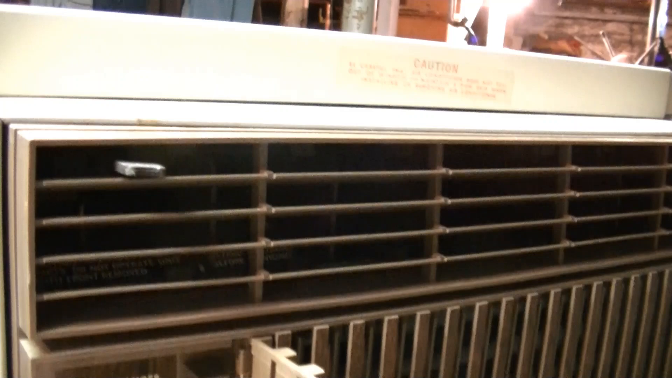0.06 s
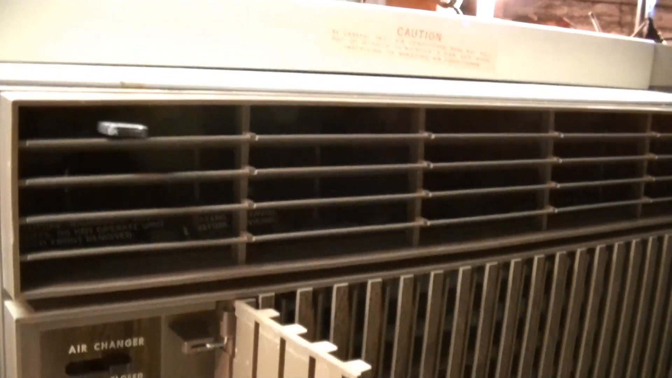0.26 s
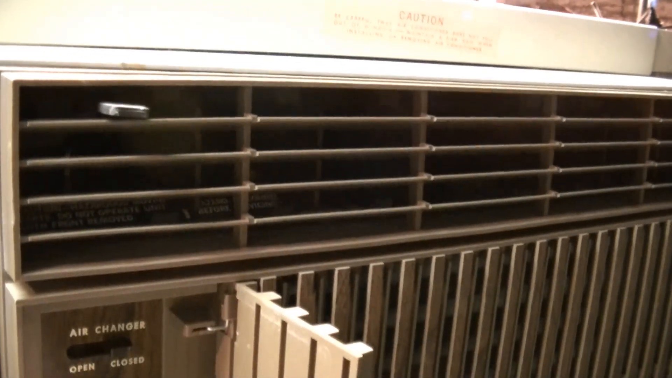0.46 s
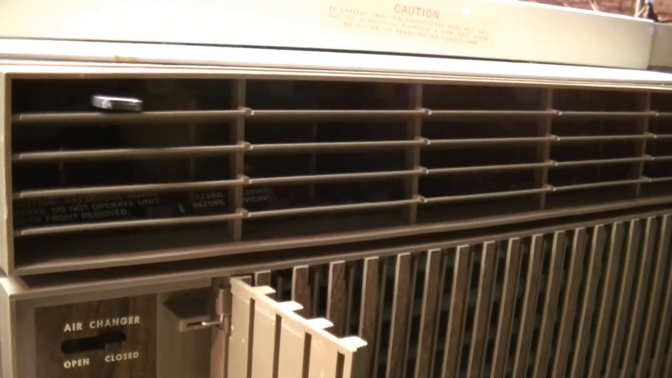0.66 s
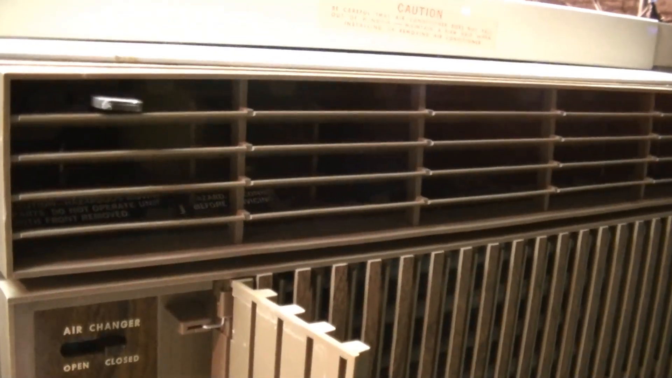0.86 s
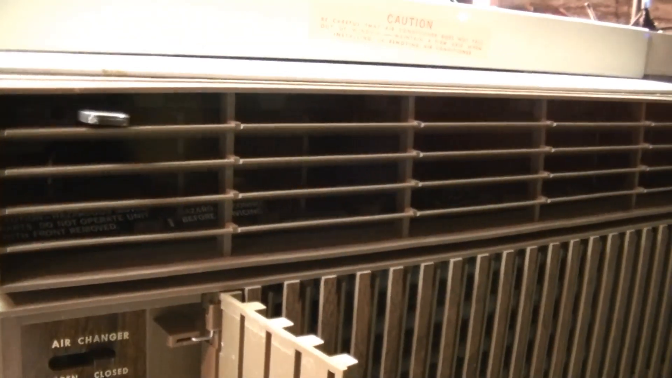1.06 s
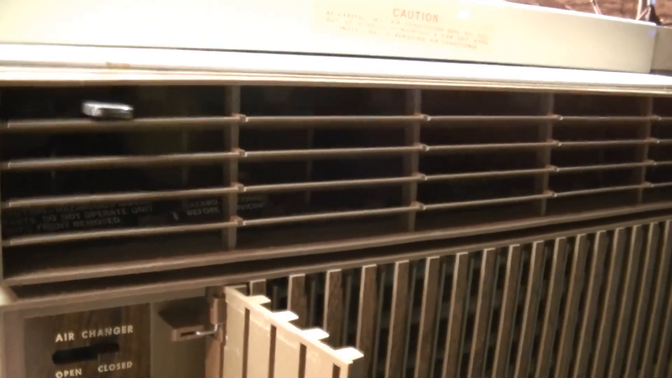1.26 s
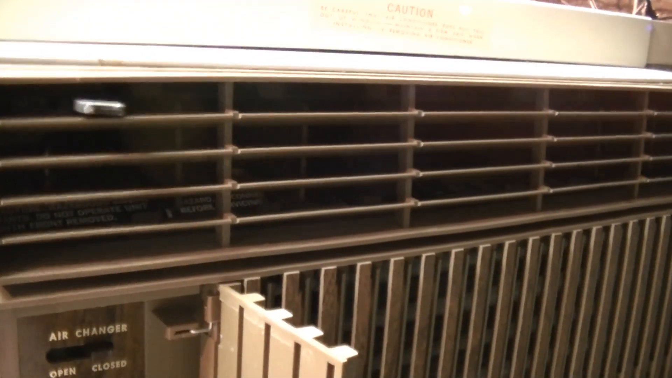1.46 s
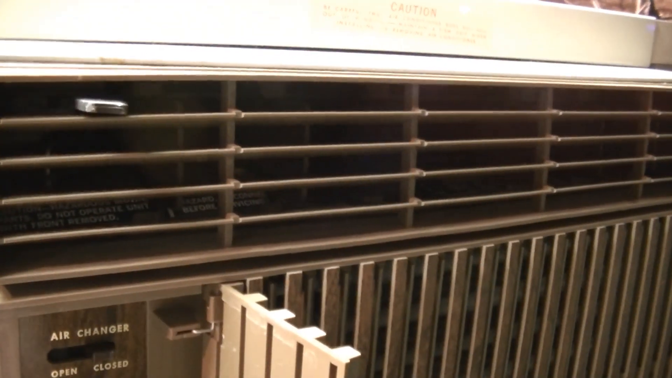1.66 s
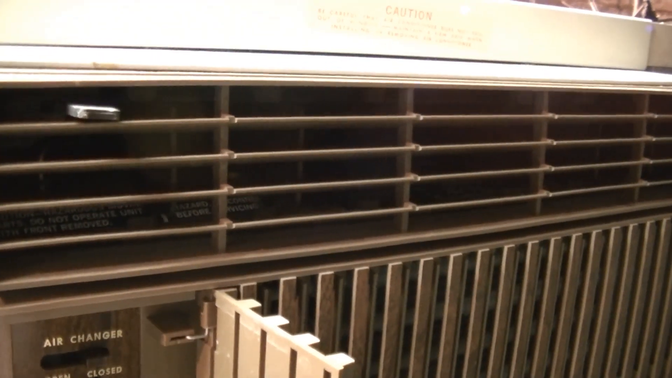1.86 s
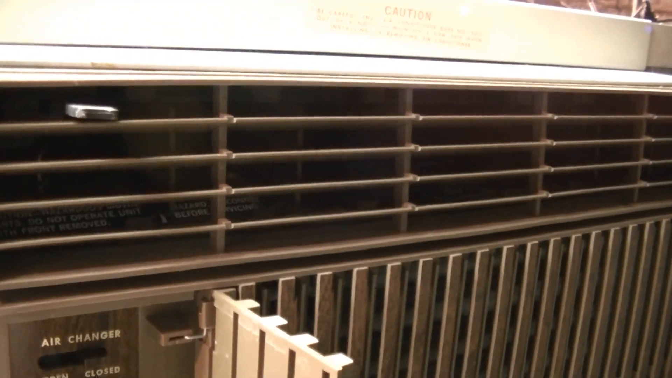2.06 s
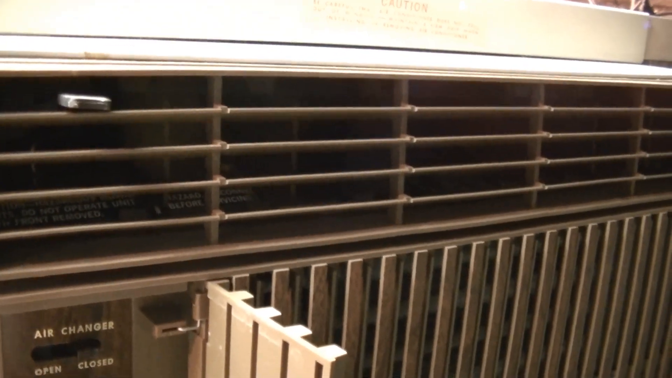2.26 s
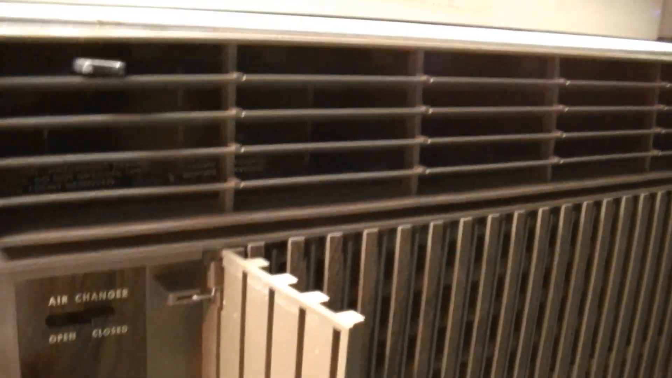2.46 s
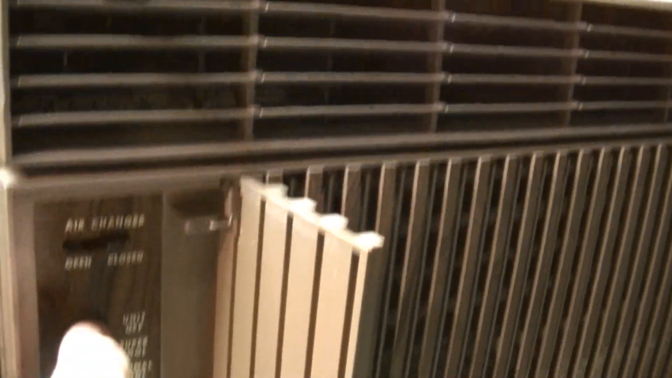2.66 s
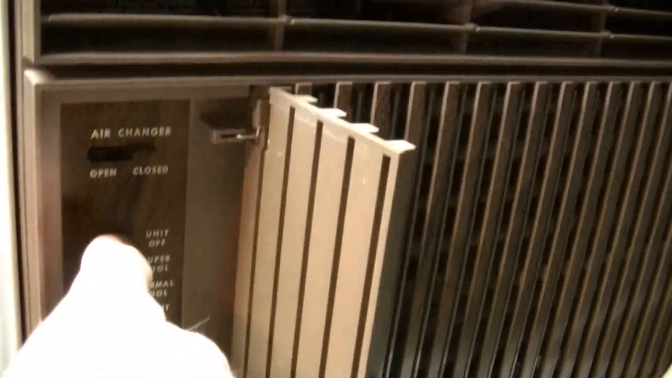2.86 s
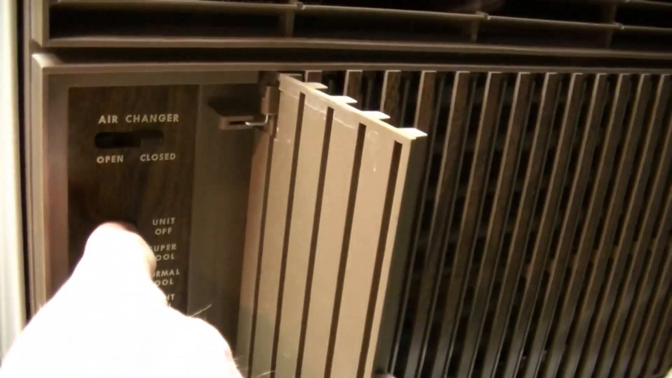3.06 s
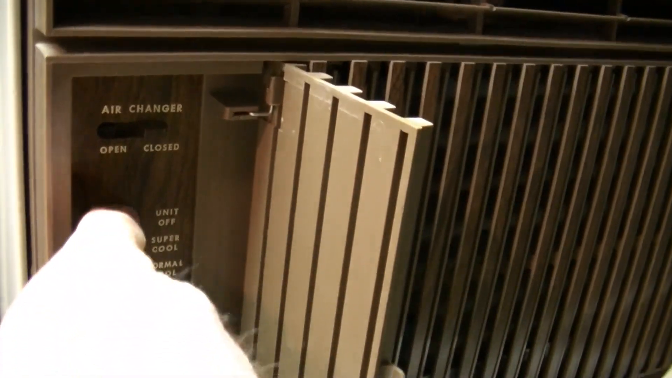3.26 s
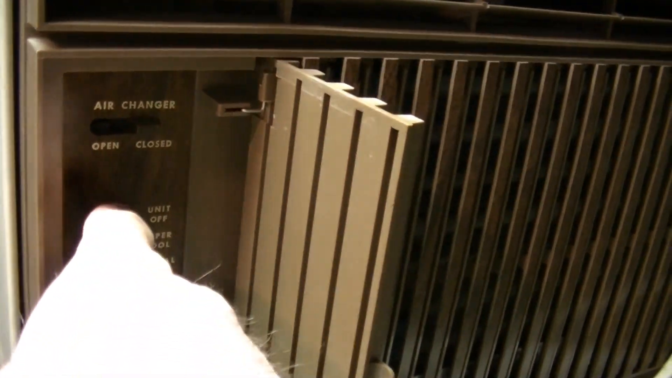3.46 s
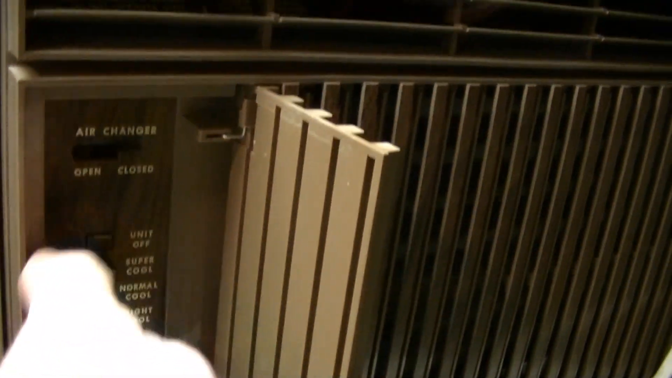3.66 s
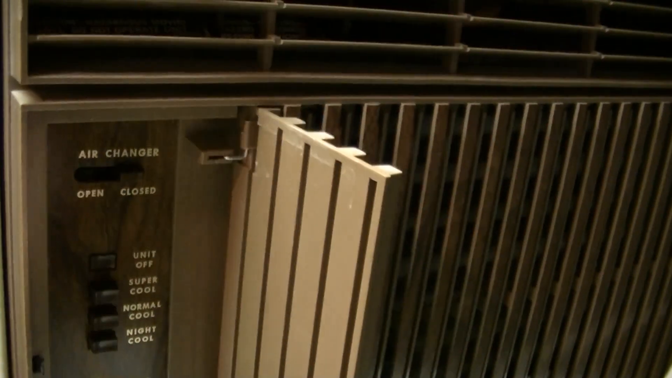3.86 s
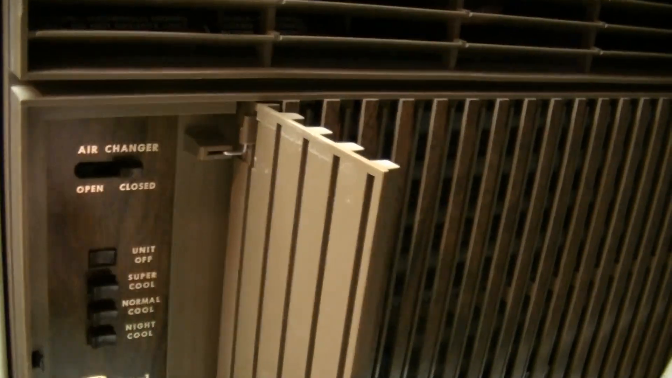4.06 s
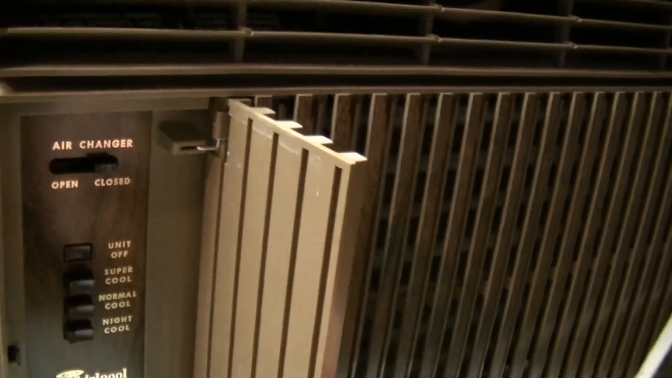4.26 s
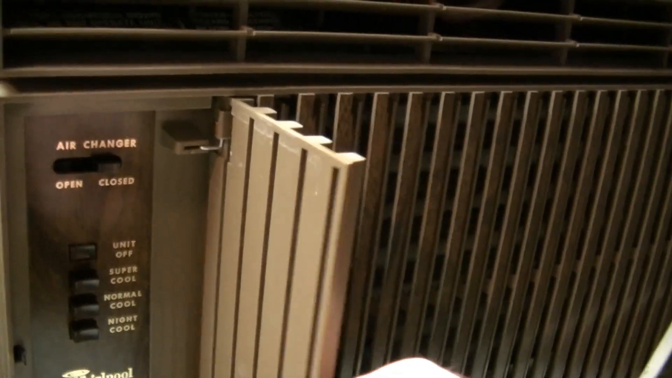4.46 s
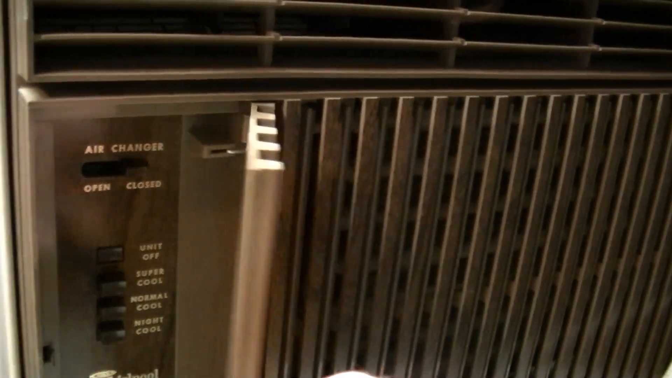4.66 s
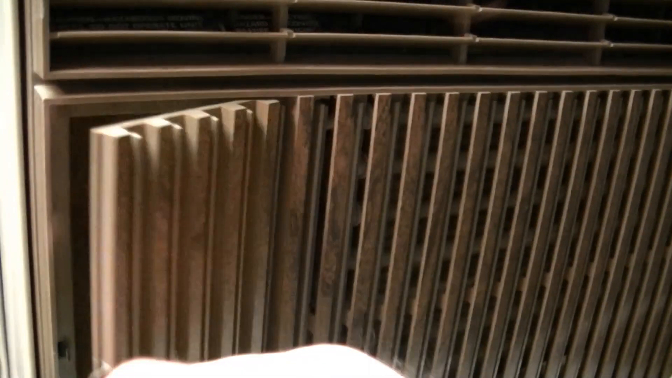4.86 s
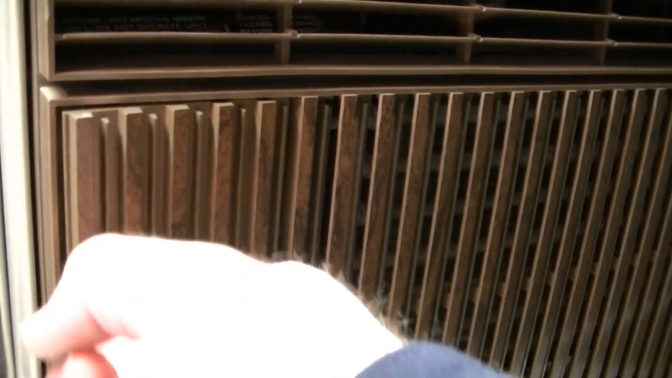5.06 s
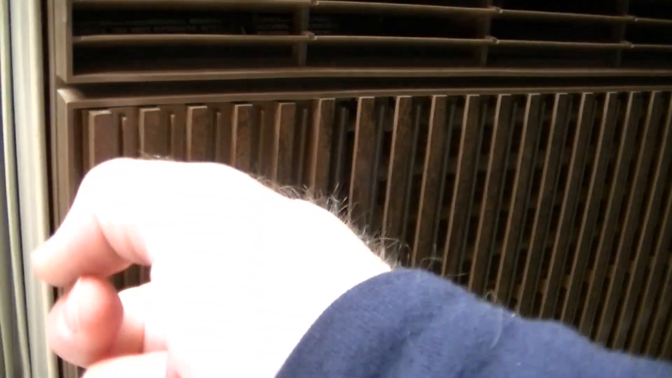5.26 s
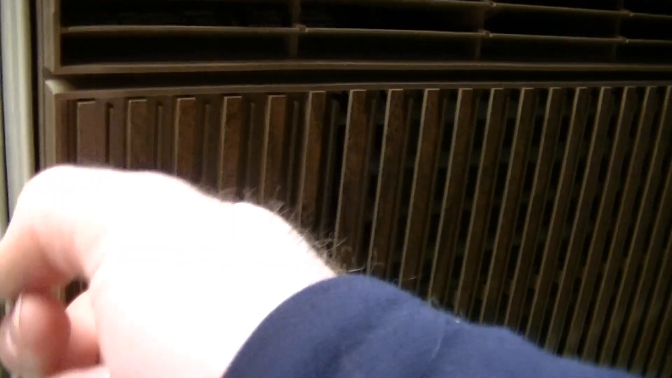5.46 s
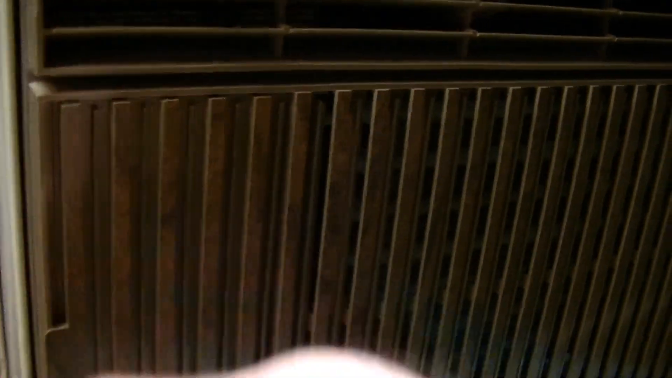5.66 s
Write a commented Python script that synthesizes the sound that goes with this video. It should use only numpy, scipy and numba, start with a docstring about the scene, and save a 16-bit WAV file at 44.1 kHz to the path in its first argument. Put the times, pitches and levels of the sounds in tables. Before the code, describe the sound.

Loud compressor hum and fan rush with thumping draught, a switch clack, a fading hollow whir, then plastic scrapes and a sharp latch snap.

```python
"""An old window air conditioner, close up: compressor lines hum and buzz under the blower's filtered noise,
and eddies of cold draught buffet the microphone until it moves down to the controls. The off button clicks,
the blower coasts down and the compressor stalls; narrow noise bands whistle faintly as refrigerant evens out.
A high squeak sinks in pitch, the plastic door slips over its catch, and a brief noise swell leads into the
latch snapping home; short noise bursts and decaying modes make these contacts."""
import sys
import numpy as np
from scipy import signal
from scipy.fft import rfft, irfft, next_fast_len
from scipy.io import wavfile
from scipy.ndimage import uniform_filter1d
from numba import njit

SR = 44100
rng = np.random.default_rng(int(sys.argv[2]) if len(sys.argv) > 2 else 0)


def persist_wave(psi):
    """Save psi, clipped to +-1, as 16-bit WAV."""
    counts = np.round(np.clip(psi, -1, 1) * 32767).astype(np.int16)
    wavfile.write(sys.argv[1], SR, np.atleast_2d(counts).T)


N = 252252
T = np.arange(N) / SR


def undb(db):
    """Decibels to amplitude gain."""
    return 10 ** (np.asarray(db) / 20)


def unit(x):
    """Scale to rms 1."""
    return x / np.sqrt(np.mean(x ** 2))


def curve(rows):
    """One control per column, joined by straight lines in time."""
    s, *columns = np.transpose(rows)
    return [np.interp(T, s, c) for c in columns]


def across(points, hz):
    """Read (Hz, value) points on a log-frequency axis."""
    f, value = np.transpose(points)
    return np.interp(np.log(hz + 1), np.log(f), value)


def colour(x, points, peaks=(), tilt=0):
    """Filter by a spectrum plus resonances; tilt is in dB per octave above 900 Hz."""
    size = next_fast_len(x.shape[-1])
    hz = np.arange(size // 2 + 1) * SR / size
    db = across(points, hz) + tilt * np.log2(np.maximum(hz, 900) / 2000)
    for f, width, lift in peaks:
        db = db + lift / (1 + (2 * (hz - f) / width) ** 2)
    return irfft(rfft(x, size) * undb(db), size)[..., :x.shape[-1]]


# colour of the difference between the two microphone ports: freq_hz, lift_db
PORT_DIFFERENCE = [(25, 4), (60, 7), (250, -3.5), (2500, -3.5), (5500, 6.5), (11000, 9.5)]


def noise(side_db, size=N):
    """Two-port noise: shared part plus an opposed part, coloured, then scaled by side_db."""
    mid, side = rng.standard_normal((2, size))
    side = colour(side, PORT_DIFFERENCE)
    return mid + undb(side_db) * np.array([side, -side])


def walk(rate_hz):
    """Smooth random wander, spread near 1."""
    k = int(SR / rate_hz)
    steps = np.repeat(rng.standard_normal(N // k + 1), k)
    return 1.25 * uniform_filter1d(uniform_filter1d(steps, k), k)[:N]


def fade(t, t60):
    """Exponential decay from t = 0, 60 dB in t60 seconds."""
    return undb(-60 * np.maximum(t, 0) / t60)


def bell(t, length):
    """A swell centred on t = 0, length seconds wide at half height."""
    return .5 ** ((2 * t / length) ** 2)


def add(out, s, sound):
    """Mix a sound in at time s."""
    i = int(s * SR)
    out[:, i:i + sound.shape[1]] += sound[:, :N - i]


def whistle(hz, width_hz):
    """A narrow band of noise round a centre that may move; rms 1."""
    lowpass = signal.butter(2, width_hz / 2, fs=SR, output="sos")
    slow = signal.sosfilt(lowpass, rng.standard_normal((2, N)))
    phase = 2 * np.pi * np.cumsum(hz * np.ones(N)) / SR
    return unit(slow[0] * np.cos(phase) + slow[1] * np.sin(phase))


# freq_hz, relative_level_db
HISS_SPECTRUM = [(30, 0), (1000, -3), (5000, 2), (6200, 1.5), (7400, 3), (9000, 0.5), (13000, 2.5),
                 (13800, -3), (16000, -5.5)]
HISS_DB = -55


def hiss():
    """A faint steady hiss lies under everything."""
    return undb(HISS_DB) * unit(colour(noise(side_db=-12.0), HISS_SPECTRUM))


def harmonics(rows, turns, waver_db, spread_rad):
    """Lines locked to the shaft; each may waver by waver_db and reaches the two ports in its own phase."""
    out = np.zeros((2, N))
    for order, db in rows:
        port_phase = spread_rad * np.array([[.5], [-.5]]) * rng.choice([-1, 1])
        phase = rng.uniform(0, 2 * np.pi) + port_phase
        level = np.sqrt(2) * undb(db + waver_db * walk(16.0))
        out += level * np.sin(2 * np.pi * round(order) * turns + phase)
    return out


# levels before port balance and nearness: shaft_multiple, level_db
HUM_LINES = [(2, -46), (4, -38), (6, -20), (8, -54), (10, -41.5), (12, -48)]
BUZZ_LINES = [(65, -71), (66, -58), (69, -64), (70, -65), (72, -61.5), (74, -55.5), (76, -67), (94, -73),
              (98, -64), (100, -70), (104, -68), (108, -70), (112, -72), (120, -70), (132, -72), (154, -73),
              (157, -75), (158, -70)]
# dips in the cabinet's ring: middle_s, length_s, depth_db
RING_DIPS = [(3.33, 0.019, -9), (3.404, 0.027, -24), (3.648, .14, -11)]
SHAFT_HZ, STALL_S = 58.82, 3.318
STOP_T60_S, BUZZ_T60_S = 0.022, 0.19
BOOM_DB, BOOM_T60_S = -4, 1.25  # cabinet ring after the stall, against the running hum


def compressor():
    """Cabinet booms at the sixth harmonic, pipework buzzes high up; the boom outlasts the stall."""
    turns = np.cumsum(SHAFT_HZ * (1 + 0.000307 * walk(6.23))) / SR
    driven = fade(T - STALL_S, STOP_T60_S)
    dips_db = sum(db * bell(T - s, length) for s, length, db in RING_DIPS)
    ringing = undb(BOOM_DB + dips_db) * fade(T - STALL_S, BOOM_T60_S)
    hum = harmonics(HUM_LINES, turns, waver_db=0.0, spread_rad=0.06)
    hum *= driven + (1 - driven) * ringing
    buzz = harmonics(BUZZ_LINES, turns, waver_db=0.1, spread_rad=0.45) * fade(T - STALL_S, BUZZ_T60_S)
    return hum * undb([[-.8], [.8]]) + buzz


# freq_hz, relative_level_db
RUSH_SPECTRUM = [(30, -49), (65, -27), (110, -16.5), (175, -0.5), (260, 1.5), (400, 0), (510, -4),
                 (850, -4), (1100, -10.5), (1350, -14), (1600, -13), (2800, -21.5), (4500, -29.5),
                 (7500, -37), (10000, -44.5), (16000, -48)]
DUCT_SPECTRUM = [(30, -41), (70, -24), (120, -9.5), (220, -5.5), (340, -4), (480, -8), (700, -6.5),
                 (1000, -4.5), (1300, -10), (1550, -20), (2500, -23.5), (3500, -26), (6000, -40),
                 (16000, -49)]
# resonances of grille and duct: freq_hz, width_hz, lift_db
RUSH_PEAKS = [(567, 36, 5), (814, 85, 3), (1313, 80, 7.5)]
DUCT_PEAKS = [(237, 16, 6), (575, 28, 11), (806, 35, 6), (942, 22, 12.5), (1175, 57, 3), (2090, 260, 11),
              (2850, 80, 7.5)]
OFF_S, HALF_SPEED_S = 3.25, 2.21  # power off; time from there to half speed
# full-speed levels before nearness; exponents of wheel speed
RUSH_DB, RUSH_POWER, TREBLE_POWER, TREBLE_HZ = -26.5, 5.37, 11, 3440
DUCT_DB, DUCT_POWER = -43.5, 0.19


def blower():
    """Air drag slows the wheel; the rush falls, treble first, and uncovers the duct's hollow ring."""
    speed = 1 / (1 + np.maximum(T - OFF_S, 0) / HALF_SPEED_S)
    rush = unit(colour(noise(side_db=-15.5), RUSH_SPECTRUM, RUSH_PEAKS))
    body = signal.sosfiltfilt(signal.butter(2, TREBLE_HZ, fs=SR, output="sos"), rush)
    rush = body * speed ** RUSH_POWER + (rush - body) * speed ** TREBLE_POWER
    duct = unit(colour(noise(side_db=-9.0), DUCT_SPECTRUM, DUCT_PEAKS)) * speed ** DUCT_POWER
    return rush * undb(RUSH_DB + 0.76 * walk(24.46)) + duct * undb(DUCT_DB + 0.78 * walk(21.28))


# freq_hz, relative_level_db
GUST_SPECTRUM = [(20, -28), (45, -18), (85, -3), (140, 2), (200, 1), (350, -4.5), (600, -16.5), (1000, -28),
                 (2000, -46), (6000, -68)]
EDDY_S, EDDY_WIDTH_HZ, EDDY_LIFT_DB = 0.015, 66, 4.5
WAKE_LAG_S, WAKE_S, WAKE_HZ, WAKE_DB = .016, .02, 250, -17  # level against the eddy


def eddy(t, opposed_db, hz):
    """A brief low pressure swing, shared and opposed at the ports, then a weaker flutter in its wake."""
    shape = bell(t - t.mean(), EDDY_S)
    wake = bell(t - t.mean() - WAKE_LAG_S, WAKE_S)
    swing_peak, wake_peak = [(f, EDDY_WIDTH_HZ, EDDY_LIFT_DB) for f in (hz, WAKE_HZ)]
    swing = colour(rng.standard_normal((2, len(t))), GUST_SPECTRUM, [swing_peak])
    flutter = colour(rng.standard_normal((2, len(t))), GUST_SPECTRUM, [wake_peak])
    shared, opposed = (unit(v * shape) + undb(WAKE_DB) * unit(w * wake) for v, w in zip(swing, flutter))
    ports = shared + undb(opposed_db) * np.array([opposed, -opposed])
    return unit(ports) * np.sqrt(np.mean(shape ** 2) / 2)


# gusts at the microphone, before port balance: middle_s, level_db, opposed_over_shared_db, centre_hz
GUSTS = [(.009, 2, 10.5, 174), (0.05, 4.5, 17, 171), (.082, -2, 6.5, 180), (.162, 0.5, 8, 120),
         (.187, -14, 16, 150), (0.238, -4.5, 7, 169), (0.286, 0.5, 8, 131), (0.303, -6, 5, 188),
         (.404, -9, 5, 130), (0.464, -0.5, 9, 110), (0.523, -13, 17, 190), (.633, -3, 11, 100),
         (0.757, -14, 19, 120), (1.076, -10, 17, 170), (1.09, -1.5, 9.5, 150), (1.134, -14, 15, 110),
         (1.237, -8.5, 11, 171), (1.374, -9.5, 12, 222), (1.551, 0.5, 9.5, 130), (1.687, -8, 19, 101),
         (1.723, -4, 11, 127), (1.778, -10, 10, 200), (1.842, 0, 9, 171), (1.88, -5, -1, 170),
         (1.898, -2.5, 14, 140), (1.92, -5, 14, 130), (1.944, 0, 9, 182), (1.981, -1.5, 8, 192),
         (1.996, -4, 19, 200), (2.05, -12, 17, 180), (2.161, -11.5, 14, 170), (2.176, -7.5, 5, 190),
         (2.196, -3.5, 10, 150), (2.244, -2.5, 9.5, 170), (2.313, 1.5, 7, 109), (2.336, -4, 7, 170),
         (2.432, -10, 8, 210), (2.46, -13, 8, 150), (2.54, -5.5, 10, 200), (2.705, -17, 13, 120)]
# weaker turbulence, falling as the microphone leaves the stream: time_s, level_db
STREAM = [(0, -19), (.7, -28), (1.5, -28), (1.9, -24.5), (2.45, -27), (2.65, -35.5), (2.8, -52), (3.3, -56)]


def draught():
    """Gusts strike the microphone one eddy at a time; weaker turbulence flutters between them."""
    out = np.zeros((2, N))
    t = np.arange(SR // 8) / SR
    for s, db, opposed_db, hz in GUSTS:
        start = s - t.mean()
        add(out, max(start, 0), undb(db) * eddy(t, opposed_db, hz)[:, start + t >= 0])
    stream_gain = undb(curve(STREAM)[0] + 4.8 * walk(39.78))
    stream = unit(colour(noise(side_db=7.5), GUST_SPECTRUM)) * stream_gain
    return (out + stream * fade(T - STREAM[-1][0], .4)) * undb([[-.8], [.8]])


def ring(modes, t):
    """Decaying modes, each struck a little differently and a touch off pitch."""
    chance = rng.standard_normal((len(modes), 2))
    out = 0
    for (f, db, t60), (a, b) in zip(modes, chance):
        tone = np.sin(2 * np.pi * f * (1 + 0.0022 * b) * t)
        out = out + undb(db + 1.8 * a) * tone * fade(t, t60)
    return out


def knock(body, peaks, tilt, contact_t60, ring_db, ring_t60, rise_s, hold_s=0, grit_db=2.5):
    """A gritty plastic contact builds as the parts press, then the panel's duller wash dies away."""
    t = np.arange(SR // 5) / SR
    grit = undb(grit_db * walk(930)[:len(t)])
    contact = unit(colour(noise(side_db=-18.0, size=len(t)) * grit, body, peaks, tilt))
    contact *= fade(t - rise_s - hold_s, contact_t60)
    wash = unit(colour(noise(side_db=-15, size=len(t)), body, peaks, tilt - 1.5))
    wash *= fade(t - hold_s, ring_t60)
    return (contact + undb(ring_db) * wash) * np.minimum(t / rise_s, 1) ** 2


# off button pressed and let go: start_s, level_db, brightness_db_per_octave, contact_t60_s
BUTTON_HITS = [(3.2582, -16.5, 4, 0.012), (3.2597, -23, 0.5, 0.026), (3.268, -23, -3, 0.02),
               (3.272, -22, -5, 0.052), (3.2865, -35, 1, .015), (3.3212, -37, -3, .015),
               (3.718, -34, -0.5, 0.051)]
# push switch body: freq_hz, relative_level_db
SWITCH_SPECTRUM = [(40, -30), (300, -18), (900, -1), (1800, 2), (2700, -1), (3500, -5), (6500, -7.5),
                   (8500, -7), (11000, -11.5), (16000, -14)]
# push switch resonances: freq_hz, width_hz, lift_db
SWITCH_PEAKS = [(1040, 120, 4), (4130, 180, 6.6), (6400, 300, 4.7), (10400, 330, 10), (11450, 300, 7)]
# push switch metal parts: freq_hz, relative_level_db, t60_s
SWITCH_MODES = [(990, -1, .12), (2483, 0, .08), (3130, -4, 0.055), (4140, -0.5, 0.19), (4360, -17, 0.16),
                (5460, -11, 0.066), (6300, -5, 0.066), (10300, -4, .035), (11450, -8, .035)]


def button(modes_db=-18):
    """The stiff switch ticks brightly, then clacks; its metal rings on, and it hardly moves the panel."""
    out = np.zeros((2, N))
    t = np.arange(SR // 5) / SR
    for s, db, tilt, contact_t60 in BUTTON_HITS:
        tick = knock(SWITCH_SPECTRUM, SWITCH_PEAKS, tilt, contact_t60,
                     ring_db=-20, ring_t60=0.14, rise_s=0.00089)
        add(out, s, undb(db) * (tick + undb(modes_db) * ring(SWITCH_MODES, t)))
    return out


# refrigerant whistles, full level: centre_hz, width_hz, level_db
WHISTLES = [(2830, 140, -59), (6640, 170, -68.5), (6950, 350, -72), (7380, 260, -68), (8400, 320, -73),
            (10250, 500, -75)]
WHISTLE_RISE_T60_S, WHISTLE_DRIFT, WHISTLE_WAVER_DB = 2.2, .005, 2  # drift as a share of pitch


def refrigerant():
    """After the stall, pressure evens out through thin tubing in faint whistles that come and go."""
    tones = 0
    for hz, width, db in WHISTLES:
        tone = whistle(hz * (1 + WHISTLE_DRIFT * walk(5)), width)
        tones = tones + tone * undb(db + WHISTLE_WAVER_DB * walk(15))
    return tones * (1 - fade(T - STALL_S, WHISTLE_RISE_T60_S)) ** 2


SQUEAK_MIDDLE_S, SQUEAK_LENGTH_S, SQUEAK_DB = 4.58, 0.38, -63.5
SQUEAK_HZ, SQUEAK_SAG_HZ_PER_S = 7850, 1300


def squeak():
    """As the hand reaches for the door, a soft, high, grainy noise band sinks in pitch."""
    t = T - SQUEAK_MIDDLE_S
    hz = SQUEAK_HZ - SQUEAK_SAG_HZ_PER_S * np.clip(t, -1, 1) + 110 * walk(16)
    return whistle(hz, 320) * bell(t, SQUEAK_LENGTH_S) * undb(SQUEAK_DB + 3 * walk(25.1))


# slips over the catch, rebounds, settling: start_s, level_db, brightness_db_per_octave, pitch_hz
DOOR_SLIPS = [(4.748, -46, 6, 3640), (4.93, -52, 3, 3600), (5.0267, -26, 1, 7000), (5.0352, -26, -5, 2930),
              (5.038, -25.5, 8, 8000), (5.0432, -28.5, -2, 5800), (5.051, -25, 0.5, 2160),
              (5.0565, -34, 3, 8100), (5.0725, -34, -4, 6000), (5.0932, -33, -2, 5800),
              (5.1212, -31, -0.5, 6800), (5.1262, -34.5, 2.5, 10000), (5.131, -27.5, -2.5, 1900),
              (5.1412, -27, -1.5, 5470), (5.148, -26.5, -4, 1400), (5.1597, -25, -3, 1180),
              (5.167, -35, -4.5, 2050), (5.25, -43, -2, 3020), (5.3638, -23.5, 3, 7000),
              (5.3688, -20, 1, 2770), (5.3735, -27.5, -2, 2850), (5.383, -25, -3, 2900),
              (5.3885, -30, -2, 4800), (5.4085, -33, -1, 4720), (5.4565, -34, 2, 2420),
              (5.4808, -38, 3, 2820), (5.601, -42.5, -5, 4100)]
# light plastic body: freq_hz, relative_level_db
PLASTIC_SPECTRUM = [(40, -22), (150, -2), (320, -13), (500, 2), (750, -8), (1200, -11), (1700, -3),
                    (2500, -0.5), (3700, -5.5), (5000, -9.5), (7500, -10.5), (12000, -19.5), (16000, -32)]
# light plastic resonances: freq_hz, width_hz, lift_db
PLASTIC_PEAKS = [(530, 90, 4), (910, 120, 21), (1352, 75, 18), (2076, 82, 12.5), (4320, 110, 5.7),
                 (5800, 150, 3), (6760, 120, 6), (8100, 120, 1), (10200, 150, 2), (10900, 150, 5.7)]
# door and catch modes: freq_hz, relative_level_db, t60_s
DOOR_MODES = [(540, -14, 0.12), (953, -5.5, 0.36), (1333, -5, .1), (1456, -2, 0.067), (2133, 1, 0.071),
              (2320, 1, 0.059)]
CATCH_MODES = [(2870, -5, 0.13), (5780, -3, 0.059), (6207, -4, 0.06), (7050, -12, 0.047), (7900, -4, 0.051),
               (10890, -12, 0.065)]
# a slip at SLIP_DB holds for SLIP_S, others in proportion to amplitude
SLIP_DB, SLIP_S, SLIP_T60_S = -26, 0.0029, 0.036


def door(modes_db=-14, dull_lift_db=1.86, spot_width=0.17, spot_lift_db=8, spot_db=-9, spot_t60=0.039,
         catch_db=-13):
    """The edge sticks and slips; each spot has its pitch, dull slips ring the door, bright ones the catch."""
    out = np.zeros((2, N))
    t = np.arange(SR // 5) / SR
    for s, db, tilt, hz in DOOR_SLIPS:
        peaks = PLASTIC_PEAKS + [(hz, spot_width * hz, spot_lift_db)]
        scrape = knock(PLASTIC_SPECTRUM, peaks, tilt, SLIP_T60_S, ring_db=-11.5, ring_t60=0.18,
                       rise_s=0.00085, hold_s=SLIP_S * undb(db - SLIP_DB))
        rings = undb(modes_db - dull_lift_db * tilt) * ring(DOOR_MODES, t)
        rings = rings + undb(catch_db + tilt) * ring(CATCH_MODES, t)
        rings = rings + ring([(hz, spot_db, spot_t60)], t)
        add(out, s, undb(db) * (scrape + rings * (1 - fade(t, .008))))
    return out


# noise bands before the snap: centre_hz, width_hz, end_level_db
LEAD_IN_BANDS = [(2400, 1600, -28), (5750, 450, -34), (7500, 460, -32), (11500, 4000, -36)]
SNAP_S, LEAD_IN_RISE_S = 5.3602, 0.054  # rise: time to swell by 60 dB


def lead_in():
    """Narrow noise bands swell briefly until the snap."""
    t = T - SNAP_S
    swell = sum(whistle(hz, width) * undb(db) for hz, width, db in LEAD_IN_BANDS)
    return swell * fade(-t, LEAD_IN_RISE_S) * (t < 0)


# latch crack and whole front grille: freq_hz, relative_level_db
SNAP_SPECTRUM = [(25, -17), (150, -21), (400, 7), (900, -0.5), (1500, -15), (2300, 5), (3600, -22),
                 (4300, -9), (4900, 4), (6000, -4), (9000, -9), (12500, -4), (16000, -31)]
GRILLE_SPECTRUM = [(30, -28), (120, -13), (300, 0), (600, -3.5), (950, -3), (1200, -13), (1700, -13),
                   (2200, -13), (3000, -10), (3450, -15), (4500, -5), (6000, -17), (9000, -14.5),
                   (13000, -13), (16000, -34)]
# grille decay: freq_hz, t60_s
GRILLE_DECAY = [(150, 0.63), (500, 0.34), (1000, 0.33), (2800, 0.18), (7000, 0.15), (15000, 0.063)]
# grille and latch modes: freq_hz, relative_level_db, t60_s
GRILLE_MODES = [(317, -4, 0.34), (466, -4.5, 0.19), (549, -11, 0.27), (704, -12, 0.44), (826, -9.5, 0.34),
                (910, 3, 0.16), (1317, -3.5, 0.13), (2130, -6, 0.16), (2245, -1, 0.12), (2815, 2.5, 0.12),
                (3670, -13, 0.16), (3865, -6, 0.12), (4450, -9, 0.14), (4800, -6, .14), (5000, -6, 0.15),
                (6121, -9, .09), (9071, -15, .11)]
LATCH_MODES = [(420, -11.5, 0.016), (4850, -5, 0.012), (5600, -15, 0.018), (6980, -11.5, 0.02),
               (10700, -15, .018), (11400, -15, .018), (12800, -16, 0.014)]


def snap(latch_db=-3.5, crack_db=-9, chatter_db=-20.0, modes_db=-18.0, hold_s=0.026, grit_db=2.0):
    """The latch cracks home; the whole grille chatters for a moment and rings down, the lows last."""
    t = np.arange(SR // 3) / SR
    crack = unit(colour(noise(side_db=-15, size=len(t)), SNAP_SPECTRUM)) * fade(t - .0008, 0.016)
    grit = undb(grit_db * walk(500)[:len(t)])
    chatter = rfft(unit(colour(noise(side_db=-12, size=len(t)) * grit, GRILLE_SPECTRUM)))
    centres, t60s = np.transpose(GRILLE_DECAY)
    hz = np.arange(chatter.shape[1]) * SR / len(t)
    # overlapping bands; those above 3500 Hz hold for less time
    tail = 0
    for band, f, t60 in zip(np.eye(len(centres)), centres, t60s):
        part = irfft(chatter * across(np.c_[centres, band], hz), len(t))
        tail = tail + part * fade(t - hold_s * min(1, 3500 / f), t60)
    grille = undb(chatter_db) * tail + undb(modes_db) * ring(GRILLE_MODES, t)
    grille = grille * (1 - fade(t, 0.12))  # the blow takes time to spread
    out = np.zeros((2, N))
    add(out, SNAP_S, undb(latch_db) * ring(LATCH_MODES, t) + undb(crack_db) * crack + grille)
    return out


# microphone's nearness to the machine, for hum and air alike: time_s, gain_db
NEARNESS = [(0, 2.5), (.4, 0.1), (.9, 1.3), (1.5, 1.5), (2, 0.5), (2.6, 1), (3.2, 2)]


def scene():
    """The machine, its draught and its controls; small plastic parts radiate little bass."""
    machine = (compressor() + blower()) * undb(curve(NEARNESS)[0])
    highpass = signal.butter(2, 110, "highpass", fs=SR, output="sos")
    clicks = signal.sosfilt(highpass, button() + door() + lead_in() + snap())
    return machine + hiss() + refrigerant() + draught() + squeak() + clicks


@njit
def follow(x, attack, release):
    """Envelope that rises fast and falls slowly."""
    y, e = np.empty(len(x)), 0.
    for i in range(len(x)):
        e += (x[i] - e) * (attack if x[i] > e else release)
        y[i] = e
    return y


TOP_HZ = 15900


def record(dry, limit_db=-6, attack_s=0.00058, release_s=0.08):
    """A limiter ducks both ports after loud peaks; what slips past full scale clips, then a low-pass."""
    envelope = follow(np.abs(dry).max(axis=0), 1 / (attack_s * SR), 1 / (release_s * SR))
    gain = np.minimum(1, undb(limit_db) / (envelope + 1e-9)) ** 0.49
    lowpass = signal.ellip(8, .2, 70, TOP_HZ, fs=SR, output="sos")
    return signal.sosfilt(lowpass, np.clip(dry * gain, -1, 1))


dry = scene()
out = record(dry)
persist_wave(out)
```